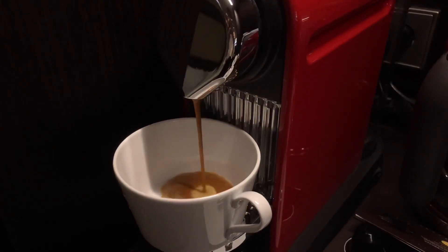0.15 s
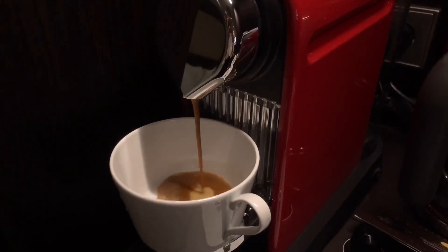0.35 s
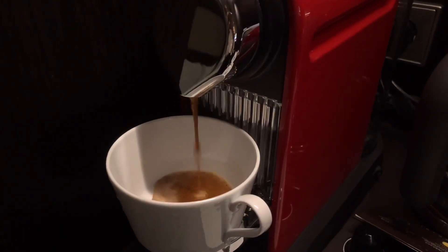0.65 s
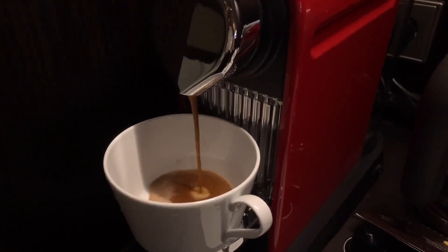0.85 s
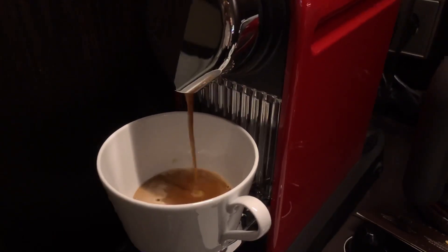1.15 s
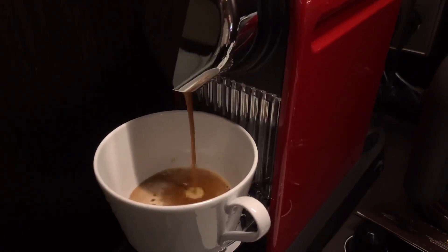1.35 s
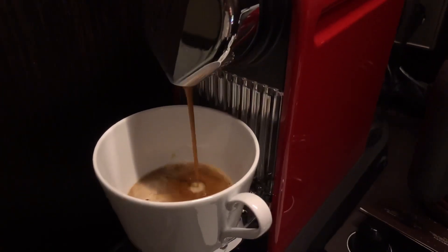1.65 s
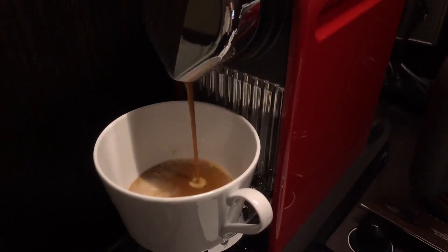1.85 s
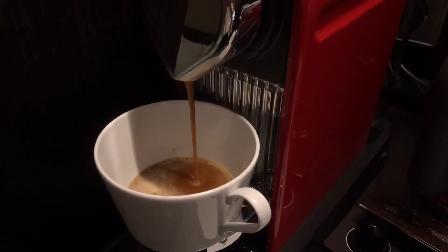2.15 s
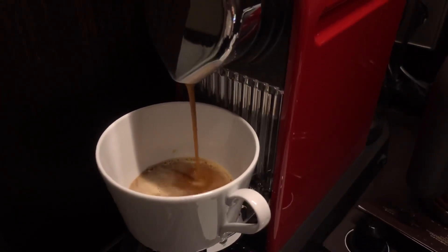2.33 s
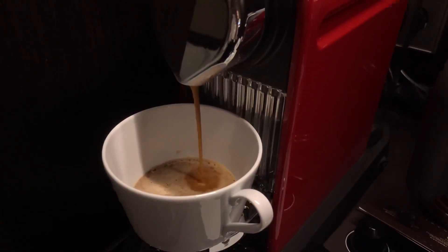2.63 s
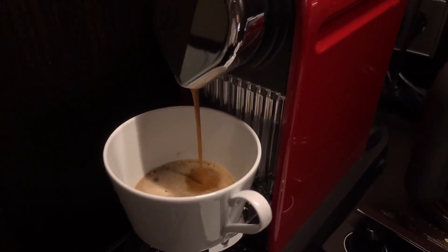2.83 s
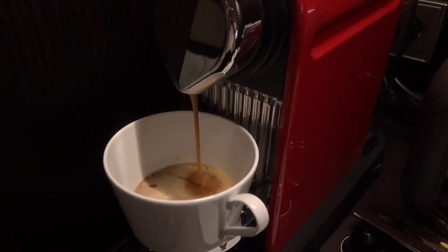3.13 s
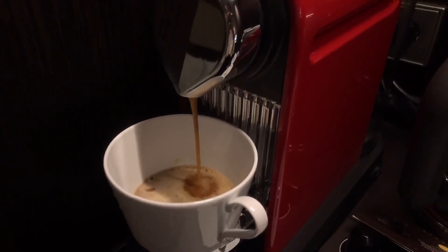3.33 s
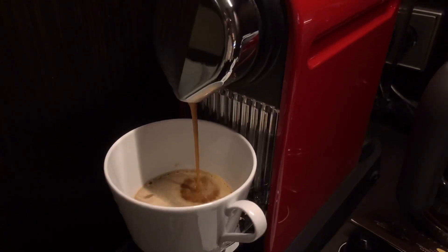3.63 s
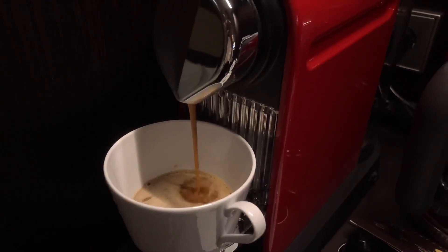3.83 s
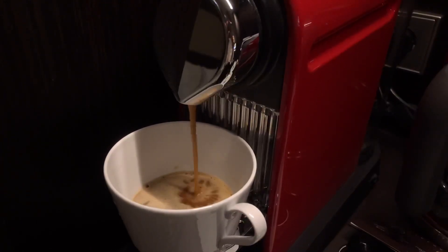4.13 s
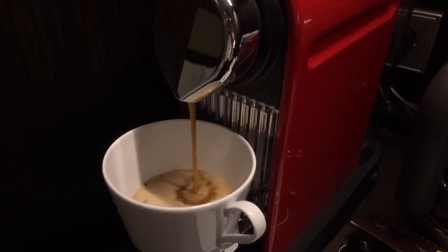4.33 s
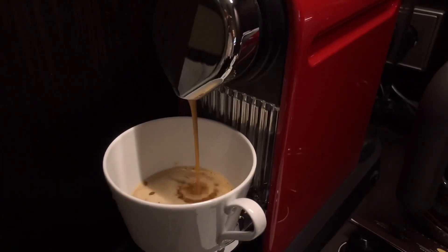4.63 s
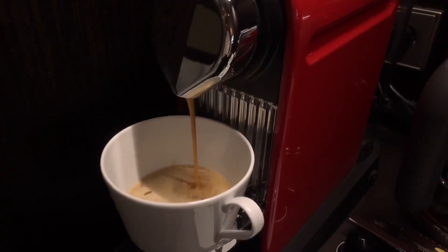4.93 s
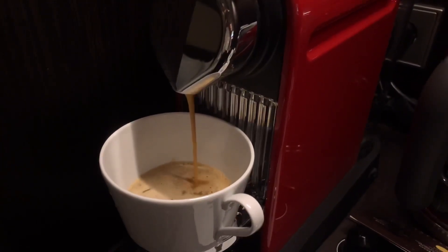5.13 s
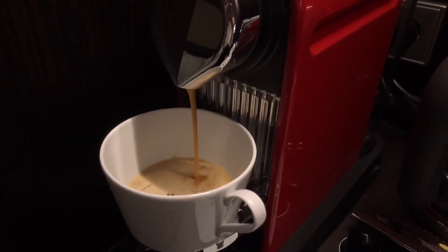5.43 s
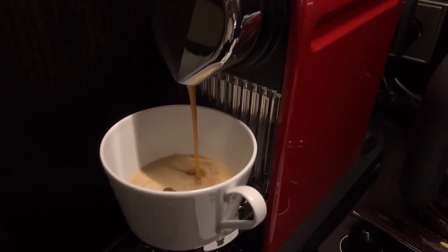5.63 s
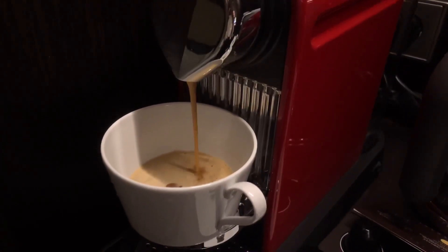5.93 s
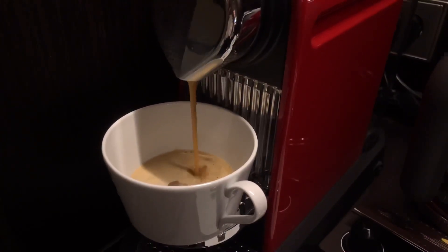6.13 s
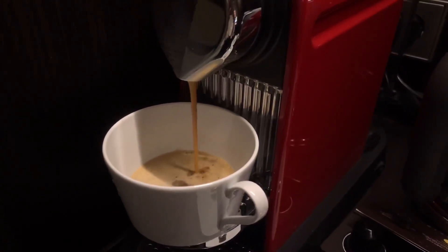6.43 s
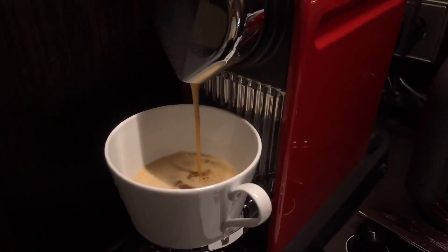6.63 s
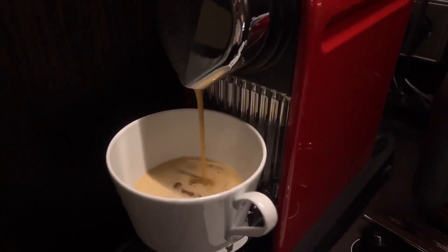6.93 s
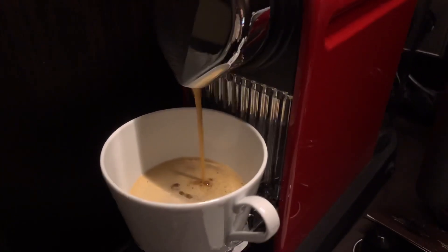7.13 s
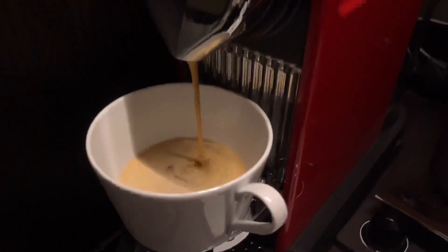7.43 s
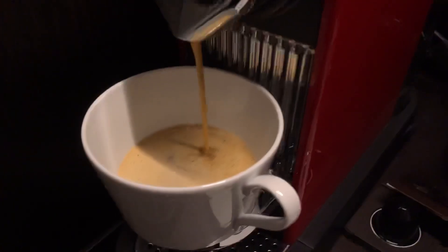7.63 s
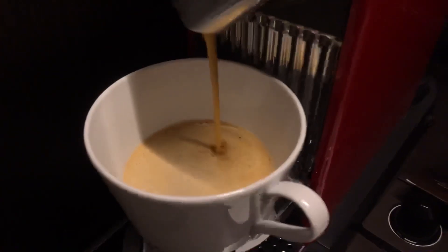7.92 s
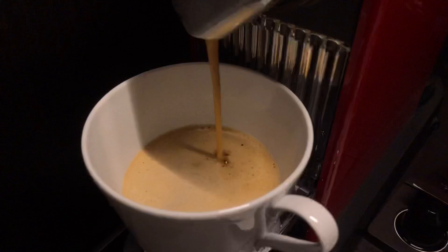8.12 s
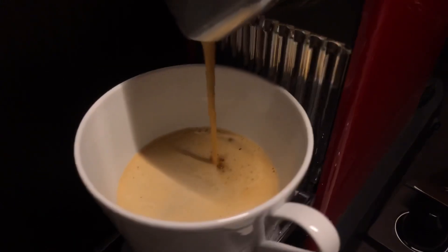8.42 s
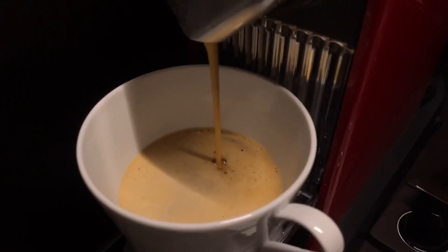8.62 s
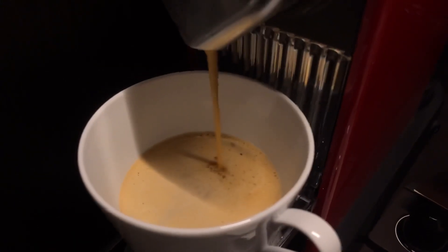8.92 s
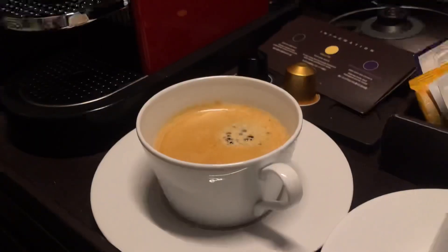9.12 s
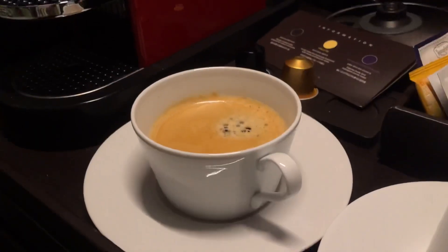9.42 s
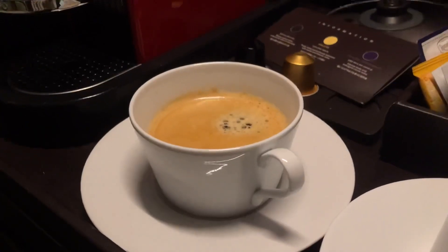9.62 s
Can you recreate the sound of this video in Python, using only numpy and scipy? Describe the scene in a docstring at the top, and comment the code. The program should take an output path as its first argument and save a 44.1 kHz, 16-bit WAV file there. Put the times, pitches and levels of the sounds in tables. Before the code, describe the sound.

An electric pump hums and buzzes in a quiet room as a coffee machine brews, its housing rattling and water hissing through it. The tone shifts as pressure builds, with a few light drips and two soft bumps along the way. The microphone, already near, moves closer to the cup and the clatter sharpens. After about nine seconds the machine stops dead and only low room noise remains.

```python
"""A pump hums, knocks and buzzes, with hissing water: a capsule coffee machine fills a cup, close by. Its
solenoid piston strikes once per mains cycle, ringing the housing and loose parts and driving water through a
chirping valve. A few drops plop; two soft bumps sound. As pressure builds, the strokes limp, early and late in
turn. Then all sound of the machine ends abruptly, leaving a low room rumble."""
import sys
import numpy as np
from scipy import signal
from scipy.fft import rfft, irfft, next_fast_len
from scipy.io import wavfile

SR = 44100
rng = np.random.default_rng(int(sys.argv[2]) if len(sys.argv) > 2 else 0)


def dump_mix(stems):
    """Bounce the given channels to the path in sys.argv[1] as a 16-bit WAV at rate SR."""
    frames = np.atleast_2d(stems).T  # one column per channel
    limited = np.clip(frames, -1, 1)  # hard clip at full scale
    pcm = np.round(limited * 32767).astype(np.int16)
    wavfile.write(sys.argv[1], SR, pcm)


N = 430840

MAINS_HZ, STOP_S = 60.021, 9.089
SETTLE_S = 0.57  # the pump starts loud and unsteady
APPROACH_S = (6.8, 7.94)  # the microphone moves in on the cup
# Base gait of the piston; each part scales it.
LIMP_FROM_S, LIMP_MS_PER_S, STEADY_LIMP_MS, UNSETTLED_LIMP_MS = 3.2, 0.014, 0.0037, 0.03
SCATTER_MS, UNSETTLED_SCATTER_MS = 0.039, 0.031

# Part levels. Each: base, then added at full pressure, before settling and from close by, all in dB.
HUM_DB, THUD_DB = (-39.5, -4, 4, 1.4), (-45, 0, 0.3, 1.4)
KNOCK_DB, CLATTER_DB = (-46, -3, 4.2, 4), (-59.5, -1.75, 1, 2.5)
HISS_DB, TICK_DB, SPRAY_DB = (-52.5, -2.5, 4.5, 0.5), (-59, 0.65, -1.2, 3.5), (-63.8, 3, -5, 4.5)
VALVE_DB, RETURN_DB = (-56, 2, 4.5, 1.5), (-67.5, 0, 1, 3)

# Capsule pressure. Each row: time in seconds, share of full pressure.
PRESSURE_CURVE = [(0, 0.08), (1.35, 0.02), (1.65, 0.21), (2.45, 0.32), (2.65, 0.39), (3.9, .56),
                  (4.15, 0.76), (6, 0.99), (9.1, 0.72)]
# Housing response at low, half and full pressure. Each row: multiple of the stroke rate, gain in dB.
HOUSING_LOW = [(1, -12), (2, 11), (3, -24.5), (4, -28), (5, -19.5), (6, -10), (7, -10), (8, -11), (9, -13),
               (10, -20), (11, -21), (12, -9.5), (13, -19), (14, -14), (15, -15), (16, -19.5), (17, -11),
               (18, -22), (19, -18.5), (20, -17), (21, -23.5), (22, -36), (23, -41)]
HOUSING_HALF = [(1, -11), (2, -17), (3, -22), (4, -30), (5, -12.5), (6, -9), (7, -24.5), (8, -9), (9, -6),
                (10, -8.5), (11, -8), (12, -10), (13, -11), (14, -9), (15, -16), (16, -7.5), (17, -18.5),
                (18, -19), (19, -21.5), (20, -37.5), (21, -24), (22, -16.5), (23, -20)]
HOUSING_FULL = [(1, -14), (2, -2), (3, -20.5), (4, -21), (5, -19.5), (6, -15), (7, -16), (8, -16),
                (9, -1.5), (10, -5.5), (11, -6.5), (12, -15.5), (13, -2), (14, -4), (15, -6.5), (16, -14.5),
                (17, -7.5), (18, -4), (19, -9.5), (20, -9.5), (21, -20), (22, -8.5), (23, -28)]
# Spectra. Each row: frequency in Hz, relative density in dB.
CLATTER_SPECTRUM = [(1330, -28), (1440, 10), (1520, 7), (1650, 10.5), (1750, 4.5), (1900, 9.5), (2020, 2),
                    (2140, 4), (2270, -19), (2380, 4.5), (2600, -2), (3120, -0.5), (4600, -11.5)]
HISS_SPECTRUM = [(200, -2), (350, 1.5), (600, 9.5), (900, 6), (1300, -0.5), (1800, 0), (2400, -2.5),
                 (3200, -1), (4300, -5), (5200, -2.5), (6500, -5), (9000, -8.5), (13000, -13),
                 (15800, -7.5)]
ROOM_SPECTRUM = [(15, -29), (25, -8), (64, 2), (91, -2.5), (126, 0.5), (156, -16), (216, -18.5),
                 (247, -15.5), (282, -16), (553, -27.5), (2640, -40.5), (11600, -46), (13300, -44),
                 (14400, -41), (15600, -37)]
# Resonances of pump body, valve and loose parts. Each row: frequency in Hz, width in Hz, gain in dB.
TICK_RESONANCES = [(3140, 230, -4), (3980, 530, -6), (6620, 310, -2.5), (7370, 240, -3), (8270, 520, -5.5),
                   (9780, 132, 2.5), (10870, 580, -7), (12200, 540, -20.5)]
SPRAY_RESONANCES = [(12040, 420, -9), (12800, 210, -5), (13600, 300, -6.5), (15200, 410, -17)]
VALVE_RESONANCES = [(5026, 363, -0.42), (5310, 397, -0.58)]
RETURN_RESONANCES = [(6460, 180, 2.5), (7900, 370, -7.5)]
PANEL_RESONANCES = [(797.3, 34, 5), (876, 45, -3.5), (1201, 29, -2)]
FIZZ_RESONANCES = [(8200, 300, -6), (10070, 300, -4), (10800, 140, -7.5), (11500, 300, -4.5),
                   (12250, 180, -11)]
RASP_RESONANCES = [(2135, 25, 10), (2330, 25, -14.5)]
WHINE_RESONANCES = [(1316, 52, 0)]
# Spells of buzzing in loose parts. Each row: start in seconds, end in seconds, level in dB.
PANEL_BUZZES = [(-.2, .15, -41.5), (2.5, 3.4, -58), (6.3, 7.3, -55)]
FIZZ_BUZZES = [(-.2, 1.5, -57)]
RASP_BUZZES = [(1.65, 2.4, -67), (2.5, 3.3, -64.5), (3.5, 4.0, -66)]
WHINE_BUZZES = [(3.65, 5.2, -57)]
# Echoes off hard surfaces. Each row: delay in ms, drift over the scene in ms, gain in dB.
ECHOES = [(1.098, 0.058, -24.5), (2.7, -.12, -26), (4.301, .15, -14.5), (7.899, -.2, -19)]
# Drops and bubbles in the cup. Each row: start in seconds, ring level in dB, pitch in Hz,
# t60 in seconds, snap level before filtering in dB, snap cutoff in Hz.
CUP_DROPS = [(.7962, -38, 3100, .012, -22, 4000), (1.2694, -44, 6500, .006, -39, 15000),
             (1.2822, -39, 3300, .008, -35, 6000), (4.8589, -29, 1200, .028, -33, 1800),
             (5.3168, -44, 6000, .006, -41, 11000), (5.6194, -42, 1600, .01, -36, 5000),
             (7.7428, -30, 1350, .014, -21, 3600), (8.8004, -38, 8200, .006, -42, 11000)]
# Soft bumps. Each row: start in seconds, level in dB, pitch in Hz, t60 in seconds.
SOFT_BUMPS = [(1.325, -32.5, 173, 0.05), (4.451, -40, 125, .08)]

TIME_S = np.arange(N) / SR


def from_db(db):
    """Decibels to gain."""
    return 10 ** (np.asarray(db) / 20)


def unit_rms(x):
    """Scale to unit power."""
    return x / np.sqrt(np.mean(x ** 2) + 1e-20)


def pressure(at_s=TIME_S):
    """Share of full pressure."""
    return np.interp(at_s, *np.transpose(PRESSURE_CURVE))


def unsettled(at_s):
    """Share of the pump's early unrest still left."""
    return np.exp(-at_s / SETTLE_S)


def gain(part_db):
    """A part's gain follows pressure, settling and approach."""
    base_db, loaded_db, unsettled_db, close_db = part_db
    closeness = np.interp(TIME_S, APPROACH_S, [0, 1])
    return from_db(base_db + loaded_db * pressure() + unsettled_db * unsettled(TIME_S)
                   + close_db * closeness)


def spell(start_s, end_s, attack_s=0.072, release_s=0.16):
    """Swell, hold and decay, 0-1."""
    swell = np.clip((TIME_S - start_s) / attack_s + 0.5, 0, 1)
    return swell * np.exp(-np.maximum(TIME_S - end_s, 0) / release_s)


def buzz_gain(buzzes, rest_db=-np.inf):
    """A loose part buzzes in spells and trembles at rest_db between them."""
    return from_db(rest_db) + sum(from_db(db) * spell(start_s, end_s) for start_s, end_s, db in buzzes)


def band(x, low_hz, high_hz):
    """Butterworth band-pass."""
    sos = signal.butter(2, [low_hz, min(high_hz, 0.45 * SR)], "band", fs=SR, output="sos")
    return signal.sosfilt(sos, x)


def colour(x, spectrum, ring_s=0):
    """Impose a spectrum, at unit power; dense reflections smear each pulse over ring_s."""
    size = next_fast_len(N + SR // 4, True)
    hz, db = np.transpose(spectrum)
    bin_hz = np.arange(size // 2 + 1) * SR / size + 1e-3
    response = from_db(np.interp(np.log(bin_hz), np.log(hz), db, left=-120, right=-120))
    if ring_s:
        t = TIME_S[:SR // 20]
        echoes = rfft(rng.standard_normal(len(t)) * np.exp(-t / ring_s), size)
        response = response * echoes / np.abs(echoes)
    return unit_rms(irfft(rfft(x, size) * response, size)[:N])


def resonate(x, resonances):
    """Parallel resonances of alternating sign, at unit power."""
    out = 0
    for k, (hz, width_hz, db) in enumerate(resonances):
        r = np.exp(-np.pi * width_hz / SR)
        feedback = [1, -2 * r * np.cos(2 * np.pi * hz / SR), r * r]
        ring = signal.lfilter([1, 0, -1], feedback, x + 1e-18)
        out += (-1) ** k * from_db(db) * (1 - r * r) * ring
    return unit_rms(out)


def reflect(x):
    """Cup, counter and wall add short echoes that slide as the microphone drifts."""
    n = np.arange(N)
    return x + sum(from_db(db) * np.interp(n - np.round((ms + drift_ms * n / N) * SR / 1000), n, x)
                   for ms, drift_ms, db in ECHOES)


def strokes(phase, limp, scatter, uneven_db, limp_db=0, lag_ms=0):
    """One click per mains cycle; limp and scatter scale the gait, full pressure adds lag_ms."""
    cycle = np.arange(int(N / SR * MAINS_HZ) - 1)
    due_s = (cycle + phase) / MAINS_HZ
    growth_ms = LIMP_MS_PER_S * np.maximum(due_s - LIMP_FROM_S, 0)
    limp_ms = STEADY_LIMP_MS + UNSETTLED_LIMP_MS * unsettled(due_s) + growth_ms
    scatter_ms = SCATTER_MS + UNSETTLED_SCATTER_MS * unsettled(due_s)
    swing_ms = (-1) ** cycle * limp_ms
    # The sprung piston overshoots: late tends to follow early, weak to follow strong.
    wobble, surge = unit_rms(signal.lfilter([1], [1, 0.5], rng.standard_normal((2, len(due_s)))))
    late_ms = limp * swing_ms + scatter * scatter_ms * wobble + lag_ms * pressure(due_s)
    force = from_db(uneven_db * surge + limp_db * swing_ms / limp_ms.max())
    position = np.clip((due_s + late_ms / 1000) * SR, 0, N - 2)
    index, fraction = position.astype(int), position % 1
    return np.bincount(index, force * (1 - fraction), N) + np.bincount(index + 1, force * fraction, N)


def puffs(clicks, decay_s):
    """Each click releases a decaying puff of noise."""
    envelope = signal.lfilter([1], [1, -np.exp(-1 / (decay_s * SR))], clicks + 1e-18)
    return unit_rms(envelope * rng.standard_normal(N))


def ping(start_s, db, hz, t60_s):
    """Damped sine."""
    t = TIME_S[:SR // 4]
    wave = from_db(db - 60 * t / t60_s) * np.sin(2 * np.pi * hz * t)
    return np.pad(wave, (int(start_s * SR), N))[:N]


def coil_hum():
    """The coil hums at twice the mains frequency, and weakly at the mains frequency itself."""
    phase_rad = 2 * np.pi * (MAINS_HZ * TIME_S - 0.18)
    return np.sqrt(2) * (gain(HUM_DB) * np.cos(2 * phase_rad) + from_db(-51.5) * np.cos(phase_rad))


def housing(clicks, band_hz, ring_s):
    """Blows ring through one band of the housing, whose response shifts with pressure."""
    smeared = colour(clicks, [(hz, 0) for hz in band_hz], ring_s)
    out = 0
    for state, response in enumerate((HOUSING_LOW, HOUSING_HALF, HOUSING_FULL)):
        share = np.maximum(0, 1 - np.abs(2 * pressure() - state))
        out += share * colour(smeared, [(k * MAINS_HZ, db) for k, db in response])
    return out


def piston():
    """The piston rocks the case, thuds on its spring and knocks at the end of its travel."""
    rock = housing(strokes(0.252, limp=1, scatter=1.7, uneven_db=0.7, limp_db=3),
                   band_hz=(140, 450), ring_s=0.013)
    thud = housing(strokes(0.15, limp=0.8, scatter=1, uneven_db=0.6, limp_db=1.3),
                   band_hz=(450, 750), ring_s=0.007)
    knock = housing(strokes(0.85, limp=1.42, scatter=1, uneven_db=1.47, limp_db=-1.7),
                    band_hz=(750, 1600), ring_s=0.013)
    rock_db = -5.2 - 4.5 * pressure()  # back pressure shortens the stroke
    half_load_db = 1.6 * np.sin(np.pi * pressure()) ** 2
    shake = from_db(rock_db) * rock + from_db(-0.87) * thud
    return gain(THUD_DB) * from_db(half_load_db) * shake + gain(KNOCK_DB) * knock


def piston_rebounds():
    """The piston rebounds twice a cycle, the second time more weakly."""
    first = strokes(0.15, limp=0.83, scatter=0.6, uneven_db=0.34)
    second = strokes(0.72, limp=0.51, scatter=0.27, uneven_db=1.4)
    return first + from_db(-4) * second


def clatter(rebounds):
    """Rebounds smear into a bright clatter."""
    return gain(CLATTER_DB) * unit_rms(reflect(colour(rebounds, CLATTER_SPECTRUM, ring_s=0.0064)))


def panel_rattle():
    """Strokes shake a loose panel, hardest at the start."""
    blows = band(strokes(0.058, limp=2.9, scatter=1.55, uneven_db=-0.3), 703, 1620)
    return buzz_gain(PANEL_BUZZES, rest_db=-71) * resonate(blows, PANEL_RESONANCES)


def water_spray():
    """Each stroke ticks in the pump body, sets a loose part fizzing and sprays water."""
    hits = strokes(0.07, limp=3.8, scatter=1.2, uneven_db=1.1, limp_db=-0.4)
    tick = resonate(puffs(hits, decay_s=0.006), TICK_RESONANCES)
    fizz = resonate(puffs(hits, decay_s=0.0032), FIZZ_RESONANCES)
    spray = resonate(puffs(hits, decay_s=0.0045), SPRAY_RESONANCES)
    return gain(TICK_DB) * tick + buzz_gain(FIZZ_BUZZES, rest_db=-82) * fizz + gain(SPRAY_DB) * spray


def valve():
    """The valve chirps, delayed by back pressure, and ticks on the return; it sticks for a while."""
    stuck = spell(start_s=1.58, end_s=2.3)
    openings = strokes(0.15, limp=2.1, scatter=3.3, uneven_db=1.9, lag_ms=1.5)
    chirp = resonate(puffs(openings, decay_s=0.0026), VALVE_RESONANCES)
    envelope = np.abs(signal.hilbert(chirp, next_fast_len(N)))[:N]
    chirp = unit_rms(chirp / np.sqrt(1 + (envelope / 5.4) ** 2))  # soft limit
    returns = strokes(0.75, limp=1.6, scatter=3.7, uneven_db=-0.5)
    tick = resonate(puffs(returns, decay_s=0.00098), RETURN_RESONANCES)
    return gain(VALVE_DB) * from_db(-3 * stuck) * chirp + gain(RETURN_DB) * from_db(5 * stuck) * tick


def water_hiss():
    """Flowing water makes broad noise."""
    return gain(HISS_DB) * colour(rng.standard_normal(N), HISS_SPECTRUM)


def drops(snap_s=0.0012):
    """A drop snaps on the surface; its bubble rings briefly."""
    out, t = np.zeros(N), TIME_S[:SR // 50]
    for start_s, ring_db, hz, t60_s, snap_db, cutoff_hz in CUP_DROPS:
        burst = from_db(snap_db) * rng.standard_normal(len(t)) * np.exp(-t / snap_s)
        snap = signal.sosfilt(signal.butter(2, cutoff_hz, fs=SR, output="sos"), band(burst, hz, SR / 2))
        out += ping(start_s, ring_db, hz, t60_s) + np.pad(snap, (int(start_s * SR), N))[:N]
    return out


def bumps():
    """Low, quickly damped thumps."""
    return band(sum(ping(*bump) for bump in SOFT_BUMPS), 56, 310)


def rasp(rebounds):
    """Rebounds set a loose part rasping."""
    return buzz_gain(RASP_BUZZES, rest_db=-72) * resonate(band(rebounds, 2130, 2650), RASP_RESONANCES)


def whine(rebounds):
    """Rebounds ring a small loose part at one thin pitch."""
    return buzz_gain(WHINE_BUZZES) * resonate(band(rebounds, 1238, 1397), WHINE_RESONANCES)


def room_rumble():
    """Low noise of a quiet room."""
    return from_db(-54.5) * colour(rng.standard_normal(N), ROOM_SPECTRUM)


def scene():
    """The machine sounds until STOP_S, then ends abruptly; the rumble is 12 dB stronger afterwards."""
    pump = coil_hum() + piston()
    rebounds = piston_rebounds()
    rattles = clatter(rebounds) + panel_rattle() + rasp(rebounds) + whine(rebounds)
    water = reflect(water_spray() + valve() + water_hiss())
    machine = pump + rattles + water + drops() + bumps()
    room = room_rumble()
    running = np.clip((STOP_S - TIME_S) / 0.003 + 0.5, 0, 1)
    return (running * (machine + from_db(-12) * room) + (1 - running) * room)[None]


def record(dry):
    """Steep low-pass at 15750 Hz."""
    return signal.sosfilt(signal.ellip(12, 0.1, 90, 15750, fs=SR, output="sos"), dry)


dry = scene()
out = record(dry)
dump_mix(out)
```